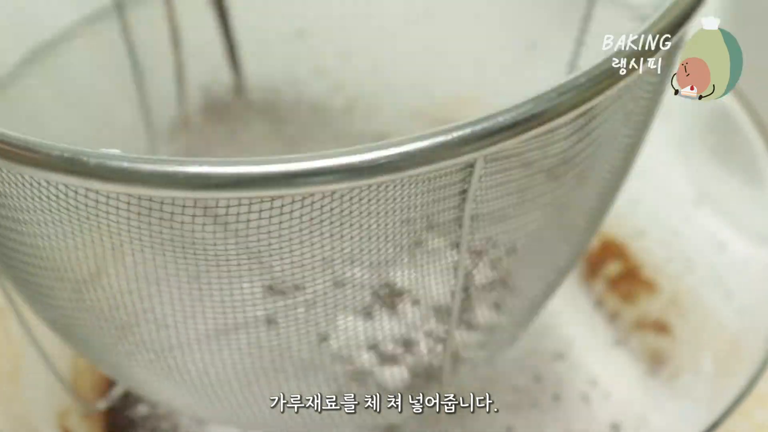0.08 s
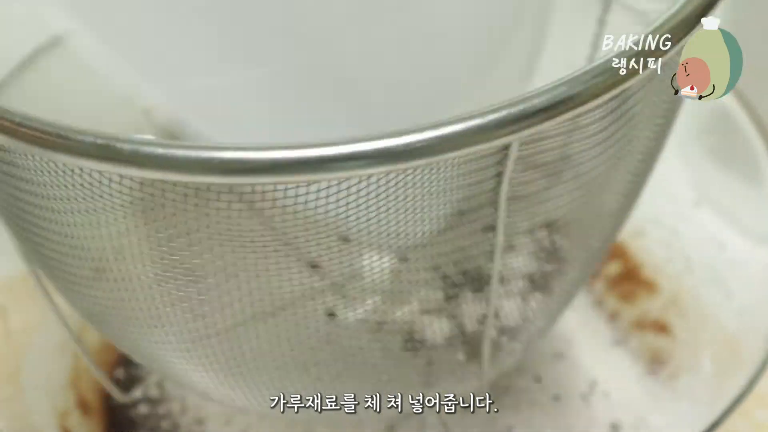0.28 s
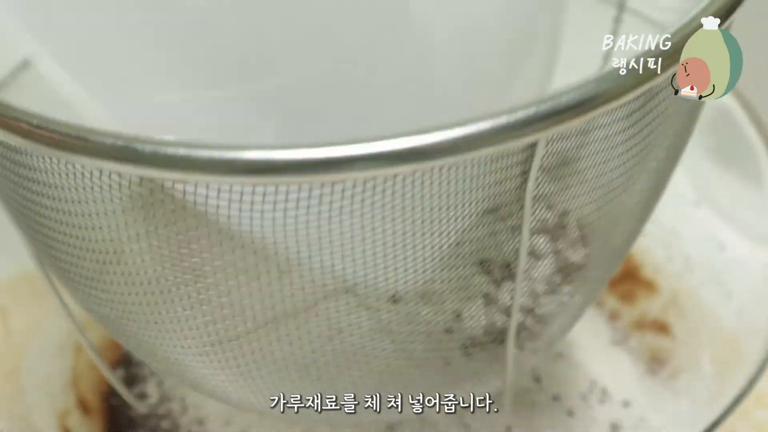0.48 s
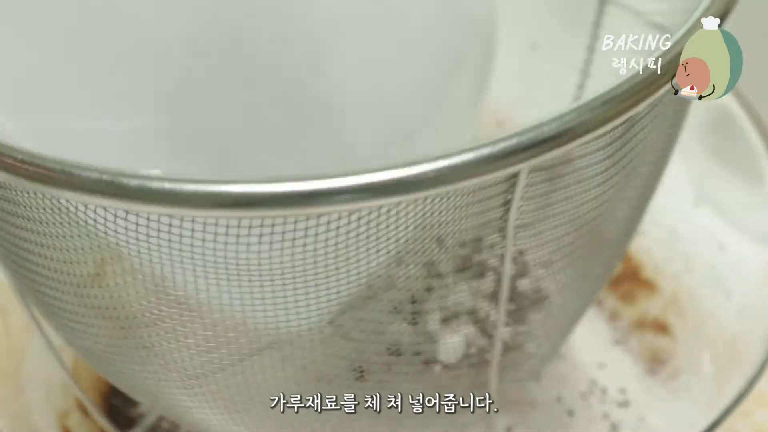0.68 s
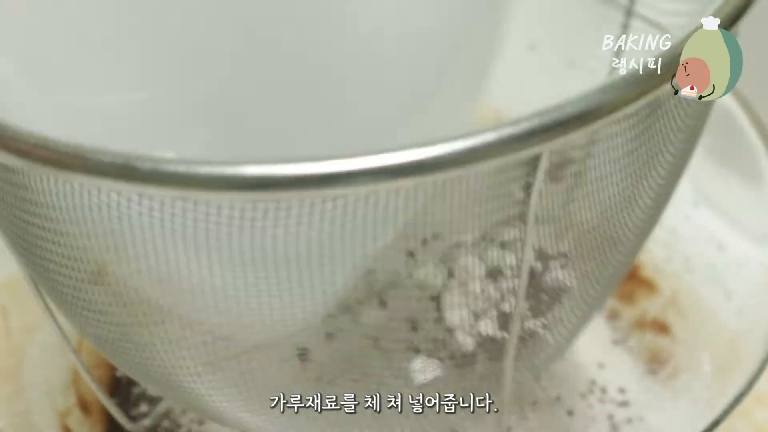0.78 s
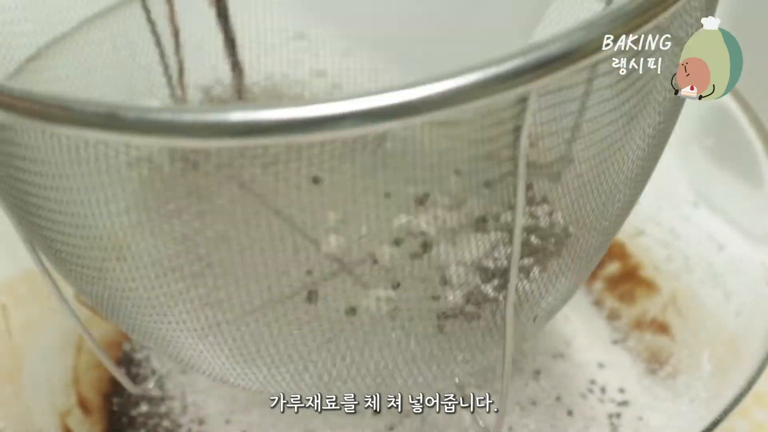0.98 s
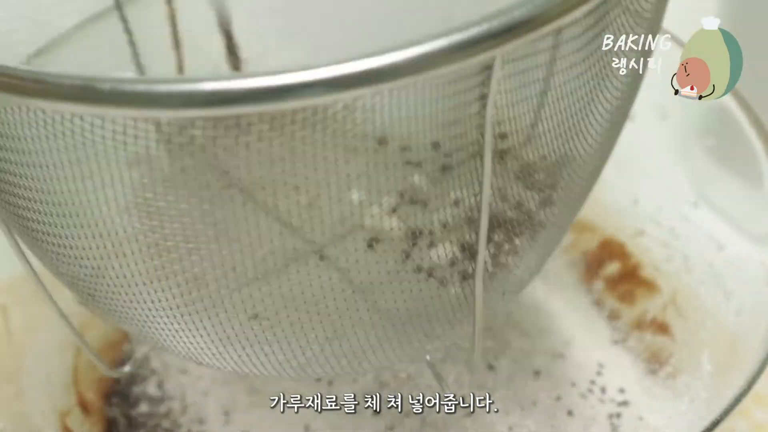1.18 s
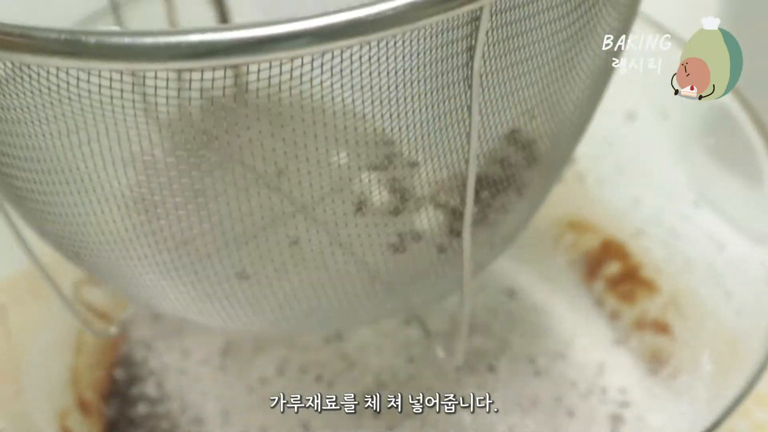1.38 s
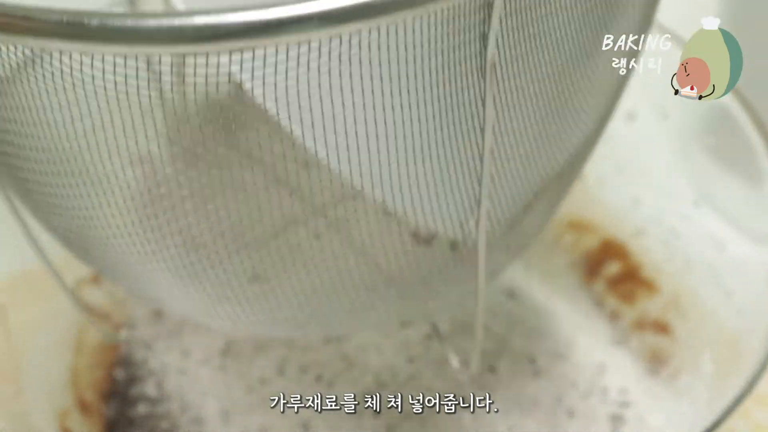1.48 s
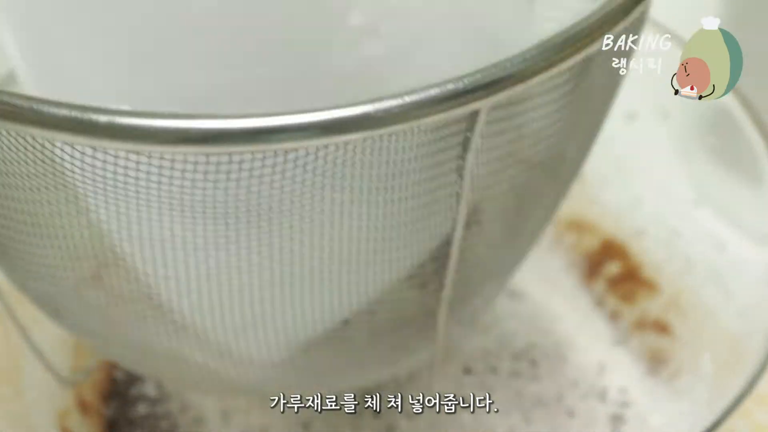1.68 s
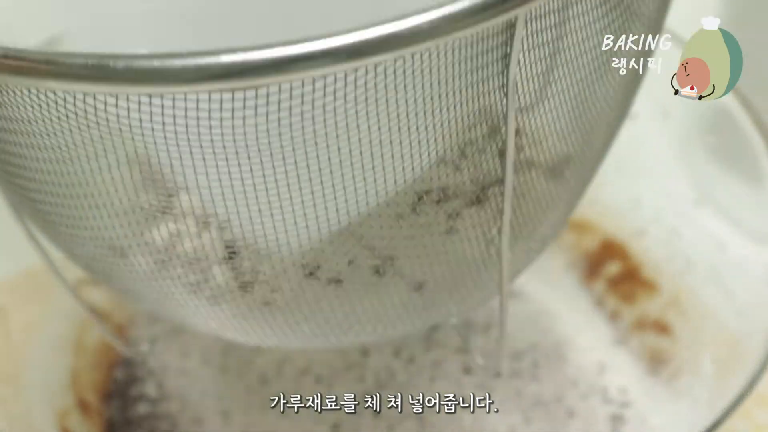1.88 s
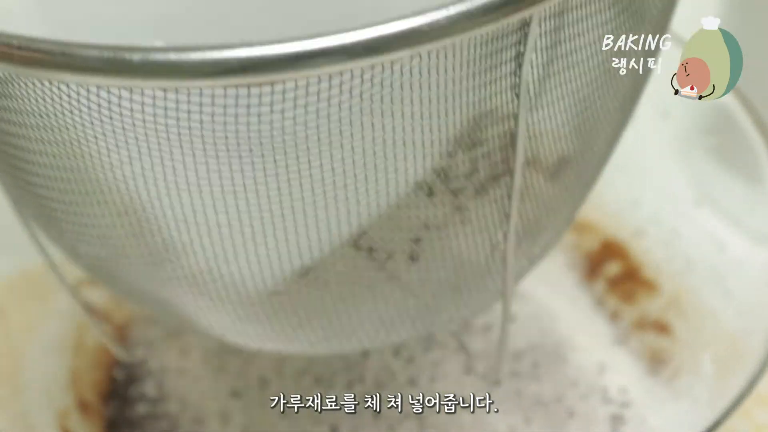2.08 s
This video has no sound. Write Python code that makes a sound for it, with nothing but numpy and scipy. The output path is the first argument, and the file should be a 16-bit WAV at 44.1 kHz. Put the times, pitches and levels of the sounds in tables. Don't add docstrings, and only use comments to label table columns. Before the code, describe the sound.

A metal mesh sieve is tapped over a bowl, close up: five loud, short knocks at about 0.22, 0.45, 0.64, 0.86 and 1.09 seconds, each with a bright mesh crack, brief dull rim ring and gritty powder hiss. Near silence follows, then a softer rattling shake from 1.7 to 1.85, and faint ticks near 2.05. A low motor hum pulses quietly throughout; tails are cut short.

```python
import sys
import numpy as np
from scipy import signal
from scipy.fft import rfft, irfft
from scipy.io import wavfile
from scipy.ndimage import uniform_filter1d

SR = 44100
rng = np.random.default_rng(int(sys.argv[2]) if len(sys.argv) > 2 else 0)


def pcm_store(signal):
    levels = np.round(np.clip(np.atleast_2d(signal), -1, 1) * 32767)
    wavfile.write(sys.argv[1], SR, levels.astype(np.int16).T)


def boost(x):
    u = np.asarray(x, float) / 20
    return 10 ** u


N = 92610

MOTOR_HZ = 120.08, 111.95
# t/s, upper tone level/dB, lower tone level/dB
MOTOR_LEVELS = [
    (0, -46, -54),
    (.2, -44.5, -51),
    (.27, -48, -53),
    (.45, -46.5, -55.5),
    (.65, -48.5, -52.5),
    (.85, -48, -56.5),
    (1.1, -52, -53.5),
    (1.3, -53, -55.5),
    (1.65, -51.5, -51),
    (2.1, -46, -44.5),
]
# f/Hz, level/dB
RUMBLE_SPECTRUM = [(20, 5), (35, -2.5), (55, 7), (80, 11.5), (118, 30.5), (160, 2), (260, 1), (1000, -20)]
# f/Hz, T60/s, level/dB, left-right likeness/1
ROOM_BANDS = [(240, 0.38, -28, 1), (464, 0.22, -12.5, 1), (1000, 0.12, -7, 0.23), (1699, 0.17, -15.5, 0.37),
              (3730, 0.19, -15, 0.25), (5870, 0.2, -19, 0.91), (11700, 0.19, -19.5, 1)]
# f/Hz, bandwidth/Hz, level/dB
MESH_RESONANCES = [(3454, 350, -3), (3936, 170, -5.5), (4520, 200, -6.5), (7250, 580, -7),
                   (9100, 1300, -10), (10500, 1000, -3.5)]
# f/Hz, bandwidth/Hz, level/dB
FRAME_RESONANCES = [(1466, 300, -5), (2010, 440, -16.5), (2228, 450, 2.5), (2870, 720, -9)]
# f/Hz, level/dB, T60/s
RIM_MODES = [(309, -23, 0.23), (520, -31.5, 0.12), (600, -35, 0.27), (722, -25.5, 0.18), (842, -45.5, .1),
             (977, -19, 0.12), (1068.3, -19.5, .17), (1060, -23.5, 0.044)]
# t/s, knock level/dB, knock f/Hz, crack level/dB, mesh rattle level/dB
TAPS = [(0.2234, -4.5, 1390, -7.5, -15.5), (.2236, -12, 2106, -20, -39.5), (.233, -17.5, 790.5, -30, -30),
        (0.2446, -4.5, 833, -4.5, -41.5), (0.4527, -3, 734, -2, -24), (.453, -12, 3393, -30, -50),
        (.4562, -7.5, 608, -14.5, -53.5), (.469, -9.5, 670, -54, -65), (0.6421, -13, 1000, -5.5, -26.5),
        (0.6408, -11.5, 2088, -21, -41.5), (.643, -18, 400, -30, -51), (.6652, -12.5, 600, -18.5, -37),
        (0.835, -39, 950, -30.5, -47.5), (0.858, -5, 1050, 2.5, -27.5), (0.8597, -15.5, 5890, -30, -50),
        (0.8593, -12, 1553, -30, -50), (0.8611, -10.5, 345.4, -12, -38.5), (1.0923, -8, 520, -2, -27),
        (1.0916, -13, 1134, -11.5, -39.5), (1.0928, -9, 2289, -20, -37.5),
        (1.0925, -10.5, 2870, -30, -50.5), (1.1, -20.5, 204, -41, -52)]
# t/s, knock level/dB, knock f/Hz, crack level/dB, mesh rattle level/dB
TOUCHES = [(1.483, -100, 873, -63.5, -49.5), (1.5041, -87.5, 1000, -35.5, -35.5),
           (1.528, -54, 1100, -39, -47), (1.55, -33.5, 1063, -37.5, -43.5), (1.553, -35, 645, -34.5, -60),
           (1.691, -46.5, 1110, -54, -52), (1.7005, -26.5, 1066, -40, -47.5),
           (1.7206, -15.5, 1090, -25.5, -33), (1.7452, -23, 1000, -19, -31), (1.754, -44, 900, -22, -50),
           (1.7815, -19, 742, -21, -40), (1.797, -15, 688, -26.5, -49), (2.0246, -39.5, 1000, -18.5, -40.5),
           (2.0738, -36.5, 1093, -27.5, -40.5), (2.0795, -28.5, 1074, -53, -75)]
# t/s, rim knocking level/dB, mesh hiss level/dB
SHAKE = [
    (1.72, -130, -130),
    (1.735, -38, -35.5),
    (1.746, -34.5, -20.5),
    (1.762, -27, -30.5),
    (1.783, -22, -21.5),
    (1.799, -21.5, -32),
    (1.808, -34, -30),
    (1.845, -37, -31.5),
    (1.86, -37.5, -47.5),
    (1.93, -130, -130),
]


def rms_one(x):
    return x / np.sqrt(np.mean(x ** 2) + 1e-20)


def in_time(rows):
    s, *columns = np.transpose(rows)
    return [np.interp(np.arange(N) / SR, s, column) for column in columns]


def at_hz(rows, hz, column=1):
    table = np.array(rows)
    return np.interp(np.log(hz + 1), np.log(table[:, 0] + 1), table[:, column])


def butterworth(x, order, hz, kind="low"):
    return signal.sosfilt(signal.butter(order, hz, kind, fs=SR, output="sos"), x)


def decay(size, t60):
    return boost(-60 * np.arange(size) / SR / t60)


def ring(clicks, hz, t60):
    r, w = boost(-60 / (t60 * SR)), 2 * np.pi * hz / SR
    return signal.lfilter([0, np.sin(w)], [1, -2 * r * np.cos(w), r * r], clicks + 1e-18)


def resonances(x, rows):
    out = 0
    for hz, width, db in rows:
        r = np.exp(-np.pi * width / SR)
        poles = [1, -2 * r * np.cos(2 * np.pi * hz / SR), r * r]
        out = out + boost(db) * signal.lfilter([(1 - r * r) / 2, 0, (r * r - 1) / 2], poles, x)
    return out


def flutter(hz):
    return rms_one(butterworth(rng.standard_normal(N), 2, hz))


def motors():
    wobble_db, fan_hz, fan_db, rumble_db = 2.56, 201, -87.5, -67.5
    t = np.arange(N) / SR
    upper_db, lower_db = in_time(MOTOR_LEVELS)
    upper_hz, lower_hz = MOTOR_HZ
    wobble = wobble_db * np.interp(t, np.linspace(0, N / SR, 30), rng.standard_normal(30))
    upper = boost(upper_db + wobble) * np.cos(2 * np.pi * upper_hz * t)
    lower = boost(lower_db) * np.cos(2 * np.pi * lower_hz * t)
    fan = boost(fan_db) * np.sin(2 * np.pi * fan_hz * t)

    hz = np.fft.rfftfreq(N, 1 / SR)
    noise = rng.standard_normal((3, N))
    stereo = noise[0] + 0.83 * noise[1:]
    spectrum_db = at_hz(RUMBLE_SPECTRUM, hz) - 9.6 * np.log2(1 + hz / 1000)
    rumble = irfft(rfft(stereo) * boost(spectrum_db), N)
    return np.sqrt(2) * (upper - lower + fan) + boost(rumble_db) * rms_one(rumble)


def kitchen(x):
    early_t60_s, early_db, rise_s, tail_end_s = 0.01, 1, 0.006, 0.13
    size = SR // 2
    t = np.arange(size) / SR
    edges = 180 * 2 ** np.arange(0, 6.6, .5)
    tail = 0
    for low, high in zip(edges, edges[1:]):
        mid, side = butterworth(rng.standard_normal((2, size)), 2, [low, high], "band")
        hz = np.sqrt(low * high)
        alike = np.clip(at_hz(ROOM_BANDS, hz, column=3), 0, 1)
        shape = decay(size, at_hz(ROOM_BANDS, hz)) + boost(early_db) * decay(size, early_t60_s)
        stereo = np.sqrt(1 + alike) * mid + np.sqrt(1 - alike) * side * [[1], [-1]]
        tail = tail + boost(at_hz(ROOM_BANDS, hz, column=2) - 25) * shape * stereo
    tail = tail * np.minimum(t / rise_s, 1) * np.exp(-(t / tail_end_s) ** 4)
    return signal.fftconvolve(x.mean(axis=0)[None], tail, axes=1)[:, :N]


def grains(per_s):
    spread_db = 4
    sizes = boost(spread_db * np.minimum(rng.exponential(1, N), 4)) * rng.choice([-1, 1], N)
    return rms_one(sizes * (rng.random(N) < per_s / SR))


def mesh(x):
    broad_db, low_hz, top_hz = -10.5, 3240, 10670
    bright = butterworth(boost(broad_db) * x + resonances(x, MESH_RESONANCES), 8, low_hz, "high")
    return butterworth(bright, 2, top_hz)


def impacts():
    knock_t60_s, rise_cycles, wander_s, soft_slows_per_db = 0.0096, 0.25, 8e-5, 0.0028
    crack_t60_s, crack_rise_s, rattle_t60_s, snap_db = 0.0074, 0.00028, 0.056, 5.5
    jar_law, jar_t60_s = 1.285, 0.026
    size = SR // 4
    t = np.arange(size) / SR
    knock, jar, bright, snap = np.zeros((2, N + SR)), np.zeros(N + SR), np.zeros(N + SR), np.zeros(N)
    contacts = TAPS + TOUCHES
    lags = wander_s * rng.uniform(-0.9, 1, (len(contacts), 1)) * [1, -1]
    for (s, knock_db, hz, crack_db, rattle_db), lag in zip(contacts, lags):
        i = int(s * SR)
        slow = 1 - soft_slows_per_db * min(knock_db, 0)
        rise = np.minimum(t * hz / rise_cycles / slow ** 2, 1) ** 2
        tone = np.sin(2 * np.pi * hz * (t + lag[:, None]))
        damping = decay(size, slow * knock_t60_s * np.sqrt(1000 / hz))
        knock[:, i:i + size] += boost(knock_db) * rise * tone * damping
        snap[i + 4] += boost(crack_db + snap_db)
        jar[i:i + size] += boost(jar_law * (knock_db + crack_db) / 2) * decay(size, jar_t60_s)
        crack = boost(crack_db) * decay(size, crack_t60_s)
        rattle = boost(rattle_db - 60 * (t / rattle_t60_s) ** 2)
        bright[i:i + size] += np.minimum(t / crack_rise_s, 1) * (crack + rattle)
    return knock[:, :N], jar[:N], bright[:N], snap


def rim(knock):
    roughness, rough_hz = 1, 37
    ringing = 0
    for hz, db, t60 in RIM_MODES:
        uneven = 1 + roughness * flutter(rough_hz)
        ringing = ringing + boost(db - 33) * ring(knock, hz, t60) * uneven
    return ringing


def sieve():
    tumbles_per_s, grains_per_s, grit_apart = 900, 9700, 0.47
    frame_db, low_cut_hz = -8.5, 349
    knock, jar, bright, snap = impacts()
    knocking_db, hiss_db = in_time(SHAKE)
    tumbles = grains(tumbles_per_s)
    own_grit = np.array([grains(grains_per_s), grains(grains_per_s)])
    grit = grains(grains_per_s) + grit_apart * own_grit
    lumps = ring(tumbles, 780, 0.028) + 0.98 * ring(tumbles, 950, 0.026) + 0.25 * ring(tumbles, 569, 0.036)
    knock = knock + boost(knocking_db) * rms_one(lumps)
    shaken_frame = (jar + boost(knocking_db + 0.5)) * grit
    frame = boost(frame_db + 7.5) * resonances(shaken_frame, FRAME_RESONANCES)
    basket = 2.0 * mesh((bright + boost(hiss_db)) * grit + snap)
    return butterworth(knock + rim(knock) + frame + basket, 4, low_cut_hz, "high")


def ports(x):
    lead_s, left_db = 36e-6, 1.77
    lead = 2 * np.pi * np.fft.rfftfreq(N, 1 / SR) * lead_s
    shifted = irfft(rfft(x) * np.exp(.5j * lead * [[1], [-1]]), N)
    return shifted * boost([[left_db / 2], [-left_db / 2]])


def suppress(x):
    gate_db, gate_low_db, tilt_db_per_octave = -52.5, 6.5, -9
    slope, floor_db = 0.91, -39.5
    smear_db, smear_top_hz = -21.5, 4000
    hz, _, spec = signal.stft(x, SR, nperseg=2048, noverlap=1536)
    hz = hz[:, None]
    power = uniform_filter1d(np.mean(np.abs(spec) ** 2, axis=0), size=15, axis=0) * 768
    threshold_db = gate_db + gate_low_db / (1 + (hz / 600) ** 4) + tilt_db_per_octave * np.log2(1 + hz / 1000)
    share = power / (power + boost(2 * threshold_db))
    gain = np.maximum(share ** slope, boost(floor_db))
    random_phase = np.exp(2j * np.pi * rng.random(spec.shape))
    smear = boost(smear_db) * random_phase / (1 + (hz / smear_top_hz) ** 4)
    return signal.istft(spec * (1 + smear) * gain, SR, nperseg=2048, noverlap=1536)[1][:, :N]


def scene():
    dry = sieve()
    limited = np.clip(ports(dry + kitchen(dry)), -.93, .93)
    return suppress(butterworth(limited, 2, 170, "high")) + motors()


def roll_off(x):
    return signal.sosfilt(signal.butter(12, 12750, fs=SR, output="sos"), x)


def record(dry):
    cut_hz, leak_db = 12200, -19.5
    low = signal.sosfilt(signal.cheby2(8, 50, cut_hz * 1.1, fs=SR, output="sos"), dry)
    leak = boost(leak_db) * butterworth(dry, 8, 16500)
    mix = np.clip(low + leak, -1, 1)
    return roll_off(mix)


dry = scene()
out = record(dry)
pcm_store(out)
```